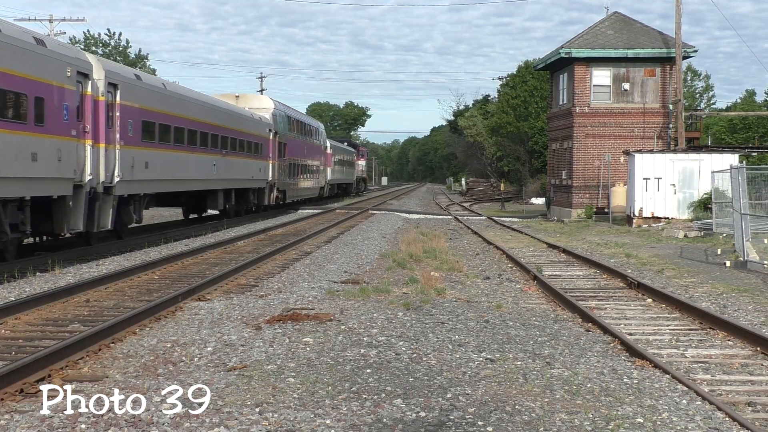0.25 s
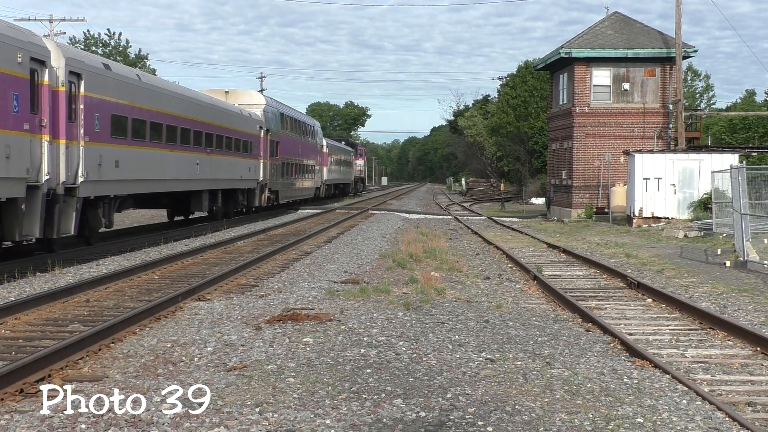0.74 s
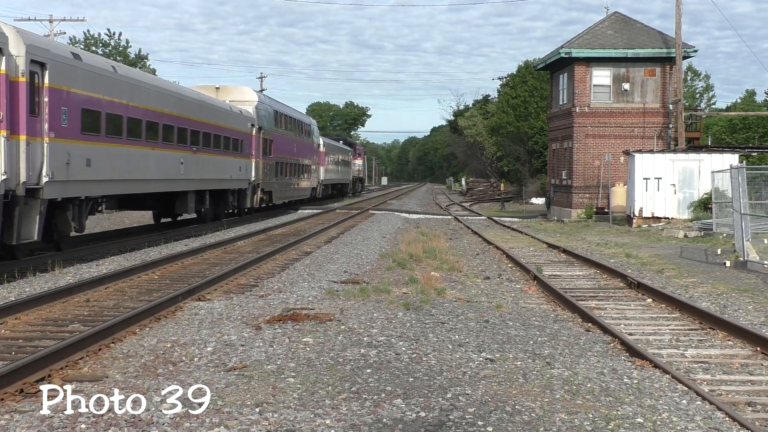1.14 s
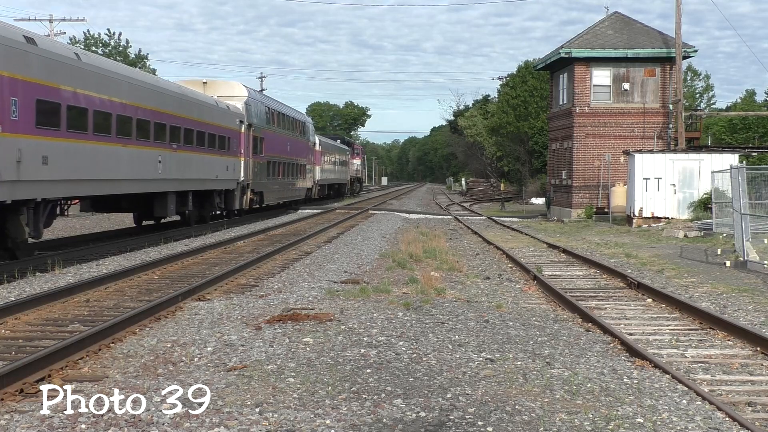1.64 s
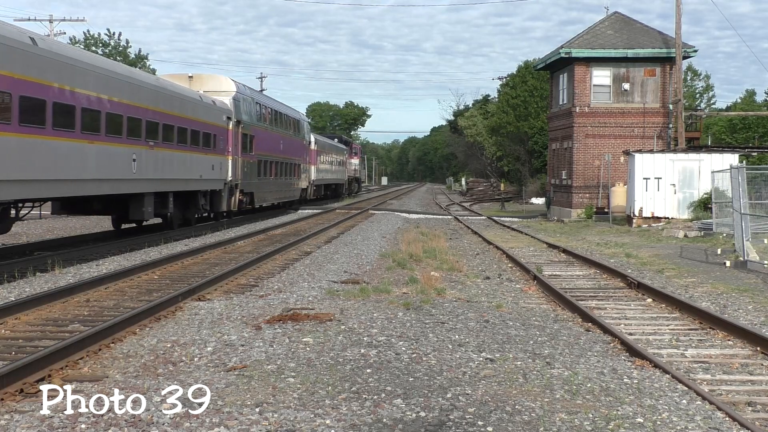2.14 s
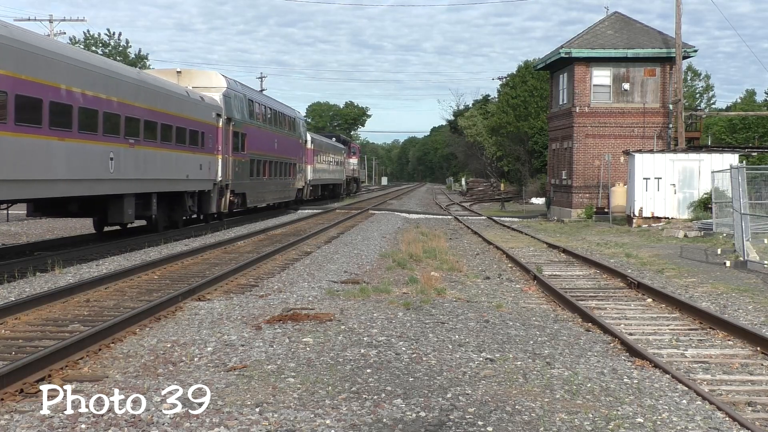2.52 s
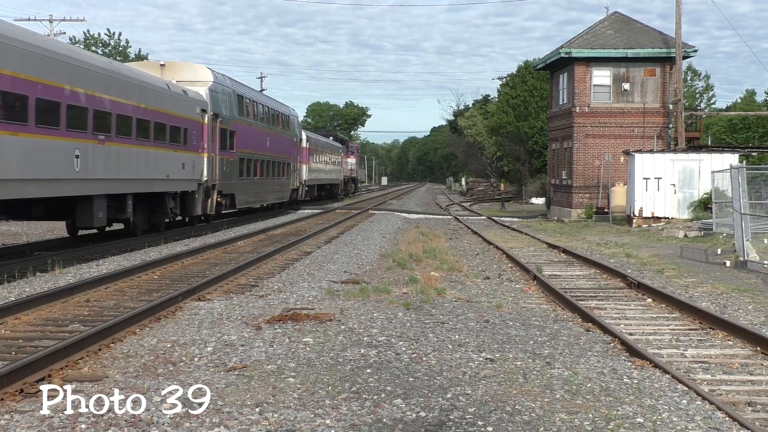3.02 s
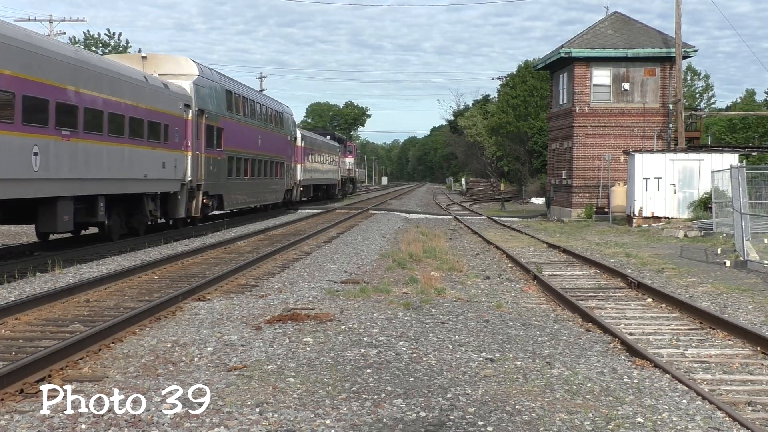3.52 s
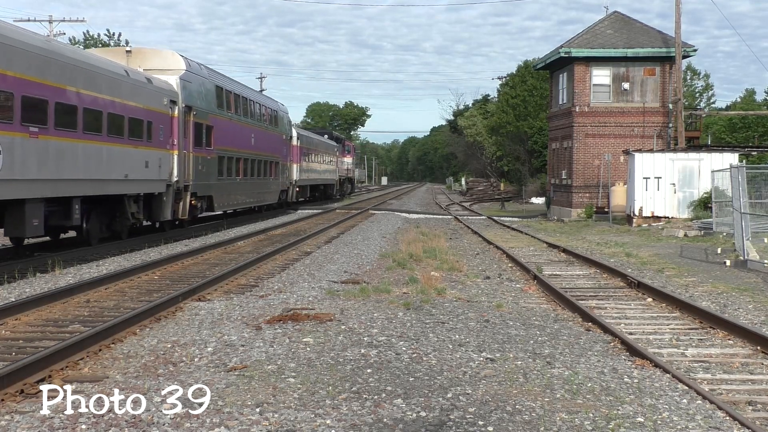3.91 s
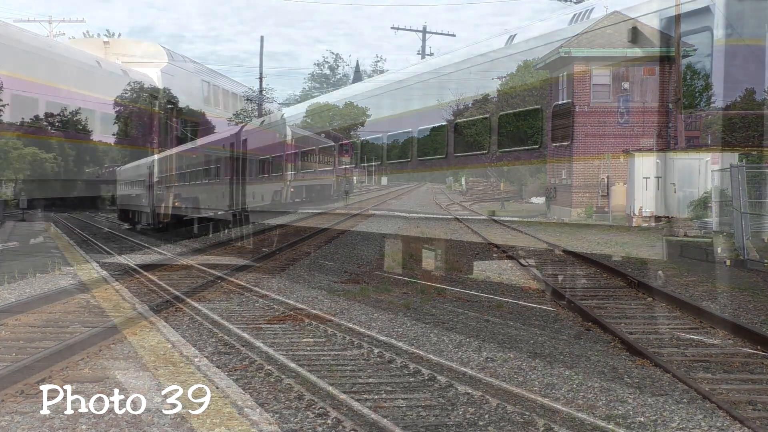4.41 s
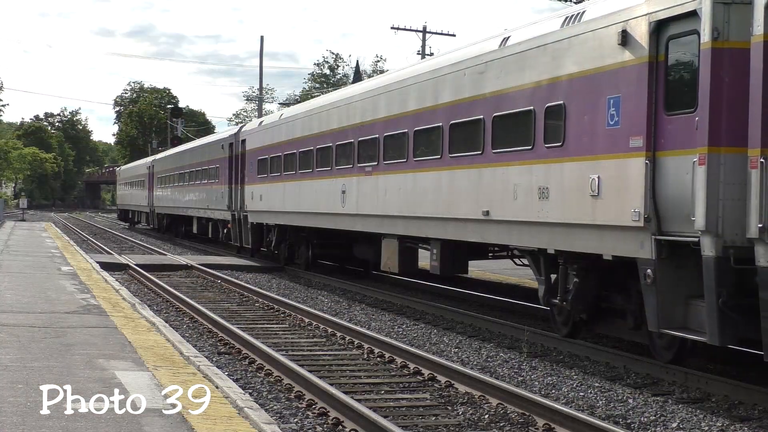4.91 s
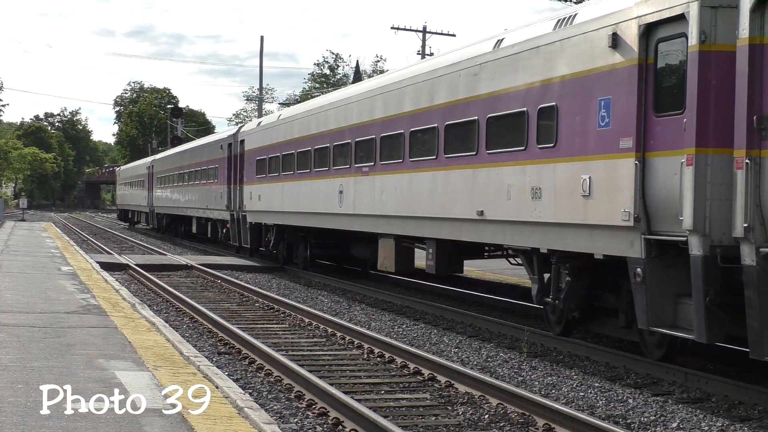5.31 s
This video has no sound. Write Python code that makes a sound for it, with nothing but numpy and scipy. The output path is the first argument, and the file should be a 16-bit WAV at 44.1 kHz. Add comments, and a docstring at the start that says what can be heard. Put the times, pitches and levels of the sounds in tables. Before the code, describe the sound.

Slow passenger train coaches squeal piercingly over clacking rail joints, then the squeals thin out and a second train's steady rumble and hum take over.

```python
"""Wheels squeal on a curve and knock over rail joints as passenger coaches roll slowly past.
The squeal drifts from near the middle to the right and thins out into short chirps; a flange sings higher.
The first train fades while a second swells: steady rumble, generator hum, thin whines, a rubbing brake.
Rolling and knocks are shaped noise; squeals, hums and whines are tones roughened by slow random drift."""
import sys
import numpy as np
from scipy import signal
from scipy.fft import rfft, irfft, next_fast_len
from scipy.io import wavfile
from scipy.ndimage import uniform_filter1d

SR = 44100
rng = np.random.default_rng(int(sys.argv[2]) if len(sys.argv) > 2 else 0)


def store_pcm(level_fs):
    """Save levels as 16-bit WAV."""
    pcm = np.round(np.clip(level_fs, -1, 1) * 32767).astype(np.int16)
    wavfile.write(sys.argv[1], SR, np.atleast_2d(pcm).T)


N = 244755
T = np.arange(N) / SR  # time in seconds

# A wheel slips in squeals. Each row: start in seconds, end in seconds, first pitch in Hz, last pitch in Hz,
# then levels in dB, before each partial's own trim, of the main note, octave, third and fourth partial.
SQUEALS = [(.008, .016, 3624, 3620, -22, -39, -48, -51), (.112, .203, 3662, 3605, -22, -33, -50.5, -52),
           (.224, .254, 3613, 3570, -23, -35, -47.5, -56), (.295, .342, 3640, 3680, -24, -50, -60, -66),
           (.351, .361, 3610, 3585, -21, -38, -45.5, -46), (.394, .412, 3585, 3580, -23, -40, -46, -46),
           (.432, .48, 3580, 3565, -22, -41, -45.5, -47), (.502, .52, 3615, 3610, -25, -46, -58, -62),
           (.531, .605, 3552, 3555, -21, -34, -45.5, -51), (.637, .712, 3558, 3515, -25, -37.5, -47, -51),
           (.8, .839, 3560, 3505, -23.5, -43, -54, -54), (.858, .9, 3600, 3575, -24, -52, -64, -70),
           (1.09, 1.151, 3626, 3585, -36, -57, -80, -79), (1.274, 1.3, 3610, 3552, -23, -41, -51, -62),
           (1.312, 1.49, 3548, 3528, -25, -35.5, -48, -58), (1.51, 1.618, 3525, 3490, -28.5, -32, -45, -53),
           (1.726, 1.85, 3480, 3526, -26, -37, -45, -49), (1.879, 1.995, 3530, 3498, -30, -39, -49, -51),
           (2.027, 2.089, 3485, 3472, -25, -39, -43.5, -53),
           (2.214, 2.35, 3455, 3502, -23, -38.5, -49, -56), (2.37, 2.435, 3502, 3495, -25, -40, -52, -58),
           (2.465, 2.595, 3483, 3465, -25.5, -42, -57, -63), (4.29, 4.42, 3540, 3530, -31.5, -59, -76, -85),
           (4.56, 4.66, 3550, 3525, -35, -65, -80, -85)]
# Wheel modes that slipping also stirs. Each row: pitch in Hz, width in Hz, relative level in dB.
WHEEL_MODES = [(4710, 140, -25), (5420, 71, -27.5), (5950, 240, -21.5), (8690, 170, -24),
               (11700, 610, -21.5), (13400, 360, -29)]
# Wheels meeting rail joints. Each row: time in seconds, thud level in dB, clang level in dB (before trims).
KNOCKS = [(0.018, -26, -38), (0.308, -33, -45), (0.643, -35, -44), (0.866, -31, -49.5), (1.102, -25, -39),
          (1.208, -27, -45), (1.316, -28.5, -60), (1.557, -29, -45), (1.788, -31, -50), (2.214, -30, -41),
          (2.277, -26, -41), (2.76, -25, -29), (3.009, -31, -44), (3.1, -29, -40), (3.209, -24, -41),
          (3.26, -24, -33), (3.726, -28, -36), (3.775, -25, -31)]
# Colour of the hiss and rasp. Each row: frequency in Hz, relative level in dB per Hz.
HISS_COLOUR = [(2000, 7), (5000, 2.5), (7500, 6.5), (9500, 1.5), (12000, 0.5), (14500, -12), (16000, -31)]
# First train's stereo likeness. Each row: frequency in Hz, left-right likeness (0-1), left's lead in radians.
FIRST_SAME = [(60, .97, 1.17), (230, .96, 1.3), (380, .93, 1.85), (500, .55, 2.45), (620, .4, 2.5),
              (700, .4, 4.2), (880, .6, 5.8), (1050, .72, 5.5), (2000, .72, 6.25), (3100, .58, 6.45),
              (5000, .15, 6.4), (7000, .3, 5.3), (10000, .85, 6.28)]
# First train's stereo balance. Each row: frequency in Hz, left minus right in dB.
FIRST_SIDE = [(60, 8.5), (200, 3.5), (380, -2), (700, -12.5), (1290, -3.5), (4400, -5), (8120, -8),
              (15000, 0)]


def amp(db):
    """Decibels to gain."""
    return 10 ** (np.asarray(db) / 20)


def unit(x):
    """Scales to rms 1."""
    return x / np.sqrt(np.mean(abs(x) ** 2) + 1e-20)


def follow(rows, t=T):
    """The columns of a curve at the times t."""
    s, *columns = np.transpose(rows)
    return [np.interp(t, s, c) for c in columns]


def read(points, hz):
    """Reads a spectrum on a log-frequency axis."""
    f, value = np.transpose(points)
    return np.interp(np.log(hz + 1), np.log(f), value)


def gate(start, end, fade):
    """1 between two times, with sloping edges outside them."""
    return np.clip(1 + np.minimum(T - start, end - T) / fade, 0, 1)


def held(start, end, grow, t60):
    """A friction tone's envelope: it grows ahead of its start, holds, and rings out after its end."""
    growth = np.clip(1 + (T - start) / grow, 0, 1) ** 2
    return growth * np.exp(-np.log(1000) * np.maximum(T - end, 0) / t60)


def bumps(times, lengths):
    """One smooth swell for each event, as rows."""
    return np.cos(np.pi * np.clip((T - times[:, None]) / lengths[:, None], -.5, .5)) ** 2


def blows(times, levels_db, rise, t60):
    """The envelope of a row of blows: each rises quickly and dies away by 60 dB in t60 seconds."""
    age = np.maximum(T - np.asarray(times)[:, None], 0)
    decay = np.exp(-np.log(1000) * age / t60)
    return (amp(np.asarray(levels_db)[:, None]) * np.minimum(age / rise, 1) * decay).sum(0)


def flutter(width_hz):
    """Complex noise of rms 1 that wanders at about the given rate."""
    # Made at a twentieth of the sample rate, then filled in
    f = np.fft.fftfreq(N // 20 + 2, 20 / SR)
    random_phase = np.exp(2j * np.pi * rng.random(len(f)))
    slow = np.fft.ifft(random_phase / (1 + abs(f / width_hz) ** 3))
    return np.interp(np.arange(N) / 20, np.arange(len(f)), unit(slow))


def turn(hz):
    """A unit phasor that follows a pitch."""
    return np.exp(2j * np.pi * np.cumsum(hz * np.ones(N)) / SR)


def pan(side_db):
    """Left and right gains of mean power 1, from left minus right in dB."""
    g = amp(np.array([[.5], [-.5]]) * side_db)
    return g / np.sqrt(np.mean(g ** 2, 0))


def ports(lead):
    """Phase turns that let the left channel lead the right, in radians."""
    return np.exp(1j * np.array([[.5], [-.5]]) * lead)


def tone(phasor, width_hz, scatter, alike=0.3):
    """A tone that arrives directly and over shifting paths, partly alike for the two ears."""
    share, same = np.clip(scatter, 0, 1), np.clip(alike, 0, 1)
    left = flutter(width_hz)
    right = same * left + np.sqrt(1 - same ** 2) * flutter(width_hz)
    paths = np.array([left, right])
    return np.sqrt(2) * (phasor * (np.sqrt(1 - share) + np.sqrt(share) * paths)).real


def skirt(phasor, order):
    """Uneven friction smears a partial into a wide, rough skirt."""
    skirt_db, skirt_hz = -21, 150  # level against the note; width for order 1
    return amp(skirt_db) * tone(phasor ** order, skirt_hz * order, scatter=1)


def noise(spectrum, same, side, patchy_db, flicker_db, size=512):
    """Stereo noise of rms 1 with drifting patches and a flicker shared by all frequencies."""
    hop = size // 4
    frames, hz = N // hop + 5, np.fft.rfftfreq(size, 1 / SR)
    a, b, c, d, patches = rng.standard_normal((5, frames, len(hz)))
    # Smoothing over time and frequency turns random levels into patches
    patches = unit(uniform_filter1d(uniform_filter1d(patches, size=14, axis=0), size=7, axis=1))
    flicker = unit(uniform_filter1d(rng.standard_normal(frames), size=5))[:, None]
    z = np.array([a + 1j * b, c + 1j * d]) * amp(patchy_db * patches + flicker_db * flicker)
    waves = signal.istft(z.transpose(0, 2, 1), nperseg=size, noverlap=size - hop)[1][:, :N]
    length = next_fast_len(N)
    left, other = rfft(waves, length)
    # Mix the two noises to the wanted likeness, then set balance and colour
    hz = np.fft.rfftfreq(length, 1 / SR)
    like, lead = [read(np.array(same)[:, [0, column]], hz) for column in (1, 2)]
    pair = ports(lead) * np.array([left, like * left + np.sqrt(1 - like ** 2) * other])
    coloured = pair * pan(read(side, hz)) * amp(read(spectrum, hz))
    return unit(irfft(coloured, length)[:, :N])


def grip(levels_db, grow, t60):
    """The envelope of one partial through all the squeals."""
    spells = [amp(db) * held(start, end, grow, t60) for (start, end, *_), db in zip(SQUEALS, levels_db)]
    return np.max(spells, 0)


def squeal():
    """Stick-slip drives one wheel mode with overtones, stirs other modes and rasps."""
    # Where the squeal comes from. Each row: time in seconds, left minus right in dB.
    squeal_side = [(0, 1.5), (.9, -2), (1.3, -9), (2.1, -16), (2.7, -17)]
    # Purer while the wheel slips steadily. Each row: time in seconds, scattered share (0-1).
    squeal_scatter = [(.2, .2), (.38, .33), (.56, .1), (.8, .3), (1.4, .2), (1.6, .52), (1.95, .55),
                      (2.05, .2), (2.6, .13), (4.3, .12)]
    main_grow_s, main_t60_s = 0.044, 0.11
    # Overtones build faster than the main note and ring out a little longer
    over_grow_s, over_t60_s = 0.0161, .15
    chatter_db, chatter_hz = 2, 22.8  # the grip is uneven
    rebound_hz = 44.53  # the note rises between squeals, when the wheel is unloaded

    main_db, *overtones_db = np.transpose(SQUEALS)[4:]
    levels = [grip(main_db, main_grow_s, main_t60_s)]
    levels += [grip(db, over_grow_s, over_t60_s) for db in overtones_db]
    base, octave, third, fourth = [level * amp(chatter_db * flutter(chatter_hz).real) for level in levels]

    pitch_points = [point for start, end, first, last, *_ in SQUEALS
                    for point in ((start, first), (end, last))]
    glide, = follow(pitch_points)
    load = grip(np.zeros(len(SQUEALS)), over_grow_s, over_t60_s)
    wheel = turn(glide + rebound_hz * (1 - load) + 8 * flutter(40).real)

    scatter, = follow(squeal_scatter)
    side_db, = follow(squeal_side)
    rough = scatter + .08  # overtones are rougher
    note = tone(wheel, width_hz=60, scatter=scatter, alike=0.05) + skirt(wheel, 1)
    out = amp(-2.5) * base * pan(side_db) * note
    # The fractional order jumps in phase each cycle, so this skirt spreads over several harmonics
    octave_note = tone(wheel ** 2, width_hz=124, scatter=rough, alike=0.68) + skirt(wheel, 2.3)
    out += amp(-3.0) * octave * pan(-13.5) * octave_note
    out += third * pan(-3.5) * tone(wheel ** 3, width_hz=164, scatter=rough, alike=1.0)
    out += amp(-4.5) * fourth * pan(-10) * tone(wheel ** 4, width_hz=130, scatter=rough, alike=0.73)

    rasp = noise(HISS_COLOUR, FIRST_SAME, FIRST_SIDE, patchy_db=2.5, flicker_db=2)
    out += amp(-14.5) * third * rasp
    modes = sum(amp(db + 5 * flutter(8).real) * tone(turn(hz), width / 2, scatter=1)
                for hz, width, db in WHEEL_MODES)
    return out + np.sqrt(octave * third) * pan(-1.66) * modes


def first_train():
    """Rolling roar swells at each joint, over a distant engine's drone and a fine hiss; all fade late."""
    # Rolling roar. Each row: time in seconds, level in dB before the fade.
    rolling = [(0, -40), (.6, -45.5), (1.2, -42), (2.45, -45.5), (3.0, -39.5), (4.1, -34)]
    # Colour of the roar. Each row: frequency in Hz, relative level in dB per Hz.
    roll_colour = [(50, -33), (110, -2.5), (170, 3), (250, -5.5), (340, 3), (410, -4), (500, -5.5),
                   (700, -7), (1200, -13), (1600, -12), (1900, -15.5), (2200, -16.5), (3000, -19),
                   (5000, -26.5), (8000, -40.5)]
    # Plate modes of the rolling wheels. Each row: pitch in Hz, width in Hz, level in dB against the roar.
    plate = [(1122, 9.5, -17), (1331, 100, -15), (1580, 11, -19.5), (2148, 34, -17.5), (2700, 31, -17.5)]
    # Distant engine. Each row: time in seconds, drone in dB (before a trim), firing note in dB; both fade.
    engine = [(0, -46.5, -46), (.3, -43.5, -51), (.55, -53, -71), (1.25, -42, -54), (1.9, -58, -78),
              (2.65, -59, -63), (3.0, -46, -52), (4.05, -40, -40.5)]
    # Colour of the drone. Each row: frequency in Hz, relative level in dB per Hz.
    drone_colour = [(20, -55), (36, -25), (50, 8), (68, 1), (92, 16.5), (130, 4.5), (250, -49)]
    # Dry sliding swells the hiss. Each row: middle in seconds, length in seconds, level in dB before the fade.
    slides = [(2.104, 0.47, -52.5), (3.17, 0.046, -52), (3.94, .8, -62), (4.453, 0.74, -54)]
    truck_db, truck_s = -17.5, 0.23  # swell at each joint: level against the listed thud, length
    hiss_db, hiss_against_roll_db = -90, -25

    roll_db, = follow(rolling)
    s, thud_db, _ = np.transpose(KNOCKS)
    truck_power = amp(thud_db + truck_db) ** 2 @ bumps(s, np.full(len(s), truck_s))
    roar = np.sqrt(amp(roll_db) ** 2 + truck_power)
    roll = roar * noise(roll_colour, FIRST_SAME, FIRST_SIDE, patchy_db=1.8, flicker_db=1.1)
    roll += roar * pan(-3) * sum(amp(db) * tone(turn(hz), width, scatter=0.96) for hz, width, db in plate)

    drone_db, firing_db = follow(engine)
    drone = amp(drone_db - 2.5) * noise(drone_colour, FIRST_SAME, FIRST_SIDE, patchy_db=1, flicker_db=.5)
    firing_note = tone(turn(50.5) * ports(1.17), width_hz=3, scatter=0.15, alike=.95)
    firing = amp(firing_db) * pan(4.2) * firing_note

    s, length, slide_db = np.transpose(slides)
    sliding = amp(hiss_db) + amp(hiss_against_roll_db) * roar + amp(slide_db) @ bumps(s, length)
    hiss = sliding * noise(HISS_COLOUR, FIRST_SAME, FIRST_SIDE, patchy_db=2, flicker_db=1.3)
    fade, = follow([(4.3, 0.9), (4.8, 0.29)])  # seconds, gain
    return fade * (roll + drone + firing + hiss)


def far_wheels():
    """Wheels further along keep ringing softly on one wandering note, its octave and their other modes."""
    # Each row: time in seconds, level in dB, pitch in Hz.
    ringing = [(0, -35, 3572), (.75, -40, 3564), (1.0, -42.5, 3570), (1.23, -49, 3570), (1.5, -32.5, 3547),
               (1.92, -36, 3560), (2.2, -38, 3540), (2.66, -41.5, 3490), (2.95, -37, 3528),
               (3.5, -44, 3517), (4.2, -49.5, 3476), (4.5, -39.5, 3525), (4.75, -51, 3620),
               (5.55, -67, 3460)]
    modes_db = -14.5  # added to the listed level of each wheel mode
    ring_db, ring_hz = follow(ringing)
    far = turn(ring_hz + 14 * flutter(3.15).real)
    ring = tone(far, width_hz=48, scatter=0.65)
    ring += amp(-24) * tone(far ** 2, width_hz=120, scatter=0.6)
    ring += sum(amp(db + modes_db) * tone(turn(hz), width / 2, scatter=0.71) for hz, width, db in WHEEL_MODES)
    return amp(ring_db) * pan(-10.0) * ring


def joints():
    """Each wheel that drops over a joint thuds in the track and clangs in the truck."""
    # Colour of the thud. Each row: frequency in Hz, relative level in dB per Hz.
    thud_colour = [(60, -9), (160, 5.5), (350, 20.5), (600, 0.5), (1200, -37)]
    # Colour of the clang. Each row: frequency in Hz, relative level in dB per Hz.
    clang_colour = [(400, 0), (1100, 0), (2200, -5), (3000, -3.5), (3600, -13), (4400, -22), (12000, -54)]
    s, thud_db, clang_db = np.transpose(KNOCKS)
    thud = blows(s, thud_db - 7, rise=0.0016, t60=0.18)
    thud = thud * noise(thud_colour, FIRST_SAME, FIRST_SIDE, patchy_db=1, flicker_db=1)
    clang = blows(s, clang_db + 1, rise=0.0014, t60=0.13)
    clang = clang * noise(clang_colour, FIRST_SAME, FIRST_SIDE, patchy_db=3, flicker_db=1)
    return thud + clang


def struck_wheel():
    """The wheel and its truck ring with each knock; one mode lingers."""
    # Modes left ringing. Each row: pitch in Hz, level in dB against the listed clang, 60 dB decay in seconds.
    struck = [(320, -6, .14), (834, -17, .16), (1190, -8, .06), (1545, -16, .15), (2140, -14, .07),
              (2825, -18, .7)]
    s, _, clang_db = np.transpose(KNOCKS)
    push = np.zeros(N)
    push[np.round(s * SR).astype(int)] = amp(clang_db)
    out = 0
    for hz, db, t60 in struck:
        keep_per_sample = np.exp(-np.log(1000) / (t60 * SR))
        ring = signal.lfilter([1], [1, -keep_per_sample], push + 1e-18)
        out = out + amp(db) * ring * tone(turn(hz), width_hz=23, scatter=0.15)
    return pan(-3) * out


def flange():
    """A flange rubs the rail head and sings, its note wandering until it settles on one wheel mode."""
    # Each row: start in seconds, end in seconds, level in dB, left minus right in dB.
    rubs = [(0.88, 1.16, -52.5, -7), (1.98, 2.757, -54.5, -9), (2.87, 3.47, -40, -2.5),
            (3.11, 3.232, -38.5, -1.5), (3.555, 3.87, -44, -19), (3.938, 4.28, -37, -21),
            (4.392, 4.61, -40.5, -20), (4.73, 4.834, -50, -6)]
    # Each row: time in seconds, pitch in Hz.
    flange_pitch = [(.83, 3950), (.97, 4075), (1.15, 3990), (2.0, 4003), (4.1, 3998)]
    grow_s, t60_s = 0.12, 0.5
    pitch, = follow(flange_pitch)
    rim = turn(pitch + 10 * flutter(30).real)
    song = amp(2 * flutter(8).real) * (tone(rim, width_hz=70, scatter=0.3) + skirt(rim, 1))
    levels = [amp(db) * pan(side_db) * held(start, end, grow_s, t60_s) for start, end, db, side_db in rubs]
    return song * np.max(levels, 0)


def slips():
    """Brief squeaks whose pitch dips as the wheel bites."""
    # Each row: middle in seconds, length in seconds, lowest pitch in Hz, level in dB, octave level in dB.
    short_slips = [(1.654, 0.013, 3500, -21.5, -57), (2.737, 0.046, 3420, -27.5, -44),
                   (3.035, 0.079, 3496, -24.5, -51.5), (3.25, 0.0744, 3420, -30, -48.5),
                   (3.77, 0.079, 3423, -26.5, -45)]
    free_hz = 3505  # the wheel's note when lightly loaded
    s, length, low_hz, level_db, octave_db = np.transpose(short_slips)
    bite = bumps(s, length)
    wheel = turn(free_hz + (low_hz - free_hz) @ np.sqrt(bite))
    out = amp(level_db) @ bite * tone(wheel, width_hz=25, scatter=0.51)
    overtones = tone(wheel ** 2, width_hz=93, scatter=0.65)
    overtones += amp(-14.5) * tone(wheel ** 3, width_hz=120, scatter=.7)
    out += amp(octave_db) @ bite * overtones
    return pan(-14) * out


def clinks():
    """Loose steel under the coach strikes and rings briefly."""
    # Each row: time in seconds, pitch in Hz, level in dB.
    loose_steel = [(2.215, 2220, -37), (3.101, 1870, -33)]
    return pan(-4) * sum(blows([s], [db], rise=.002, t60=.06) * tone(turn(hz), width_hz=60, scatter=.2)
                         for s, hz, db in loose_steel)


def second_train():
    """Rumble, generator hum and machinery whines swell together."""
    # Each row: time in seconds, level in dB.
    approach = [(2.8, -100), (3.5, -60), (4.0, -43.5), (4.25, -31), (4.7, -26), (5.15, -25.5),
                (5.55, -27.5)]
    # Colour of the rumble. Each row: frequency in Hz, relative level in dB per Hz.
    rumble_colour = [(22, -27), (50, 1), (120, -1.5), (250, 4.5), (520, 3.5), (1000, -1), (1900, -7),
                     (3000, -16), (4400, -22), (6000, -34.5), (7200, -29.5), (8500, -49), (12500, -46.5),
                     (16000, -60)]
    # Stereo likeness. Each row: frequency in Hz, left-right likeness (0-1), left's lead in radians.
    second_same = [(120, .97, .87), (220, .97, 1.47), (500, .95, 2.36), (1300, .76, 2.95), (2000, .83, 3.4),
                   (3200, .68, 3.55), (5000, .53, 4), (7200, .55, 4.7), (10000, .55, 6.28)]
    # Stereo balance. Each row: frequency in Hz, left minus right in dB.
    second_side = [(100, 0), (380, -2), (700, -10), (1290, -4.5), (2380, -6), (8120, -10.5), (15000, -16)]
    # Generator hum. Each row: pitch in Hz, level in dB against the rumble.
    generator = [(90.2, -5.5), (180.3, -20.5)]
    # Fans and gears. Each row: pitch in Hz, width in Hz, level in dB against the rumble, left's lead in radians.
    machinery = [(242, 5, -15, 1.6), (442, 5, -14, 2.2), (495, 4, -18, 2.4), (518, 16, -15, 2.4),
                 (663, 5, -21, 2.6), (947, 6, -23, 2.6), (1105, 8, -20.5, 2.9), (1325, 4, -15, 2.9),
                 (1492, 4, -17.5, -1), (1669, 5, -18.5, 1), (4120, 30, -32, 0), (4410, 35, -33, 0)]
    level_db, = follow(approach)
    rumble = noise(rumble_colour, second_same, second_side, patchy_db=0.7, flicker_db=.7)
    hum = sum(amp(db) * tone(turn(hz) * ports(.85), width_hz=4, scatter=.005) for hz, db in generator)
    # A lower engine note joins the hum
    throb = amp(-11) * gate(5.2, 5.55, .3) * tone(turn(70.2) * ports(.85), width_hz=3, scatter=.05)
    whines = pan(-6) * sum(amp(db) * tone(turn(hz) * ports(lead), width, scatter=.45)
                           for hz, width, db, lead in machinery)
    return amp(level_db) * (rumble + hum + throb + whines)


def grit_spurts():
    """Small spurts of steel and grit: each starts with a snap and fizzes out."""
    # Each row: time in seconds, snap level in dB, fizz level in dB.
    ticks = [(2.9464, -52, -49), (3.0996, -52, -49), (3.2299, -51, -59), (3.3878, -60, -60),
             (3.4521, -57, -56), (3.5192, -56, -54), (3.609, -50, -51), (3.7429, -57, -49.5),
             (4.9195, -37.5, -68)]
    # Colour of the grit. Each row: frequency in Hz, relative level in dB per Hz.
    grit_colour = [(3000, -14), (5000, 7), (8000, 2), (12000, -3), (15500, -14)]
    s, snap_db, fizz_db = np.transpose(ticks)
    spurts = blows(s, snap_db, rise=.0003, t60=0.012)
    spurts += blows(s, fizz_db, rise=0.0041, t60=0.19)
    return spurts * noise(grit_colour, FIRST_SAME, FIRST_SIDE, patchy_db=2, flicker_db=2)


def brake():
    """A two-note whine that swells and sizzles each time the shoe catches the wheel."""
    # Short rubbing spells. Each row: start in seconds, end in seconds, lower note in dB, upper note in dB.
    spells = [(4.207, 4.41, -45, -67), (4.465, 4.516, -40.5, -51.5), (4.726, 4.78, -41.5, -52.5),
              (4.8, 4.848, -39.5, -47), (4.988, 5.028, -44.5, -49), (5.066, 5.142, -42, -54.5),
              (5.266, 5.292, -40.5, -51), (5.327, 5.342, -42, -55.5), (5.51, 5.557, -45, -52.5)]
    # Pitches in Hz of the lower and upper note.
    brake_hz = (2720, 5469)
    # Drag between spells, in dB against the lower and upper note.
    brake_drag_db = (-7, -14)
    # High modes. Each row: pitch in Hz, level in dB against the upper note's middle level.
    brake_modes = [(7050, -8), (8650, -15), (10400, -18.5)]
    grow_s, t60_s = 0.014, 0.21
    start, end, *notes_db = np.transpose(spells)
    rubs = np.array([held(a, b, grow_s, t60_s) for a, b in zip(start, end)])
    drag = gate(start[0], end[-1], 0.16)  # between spells the shoe still drags a little
    whine = 0
    for hz, db, drag_db in zip(brake_hz, notes_db, brake_drag_db):
        caught = (amp(db)[:, None] * rubs).max(0)
        dragging = drag * amp(drag_db + np.interp(T, start, db))
        whine = whine + np.maximum(caught, dragging) * tone(turn(hz), width_hz=40.3, scatter=0.43)
    modes = sum(amp(db) * tone(turn(hz), width_hz=130, scatter=0.96) for hz, db in brake_modes)
    sizzle = amp(np.median(notes_db[1])) * rubs.max(0) * modes
    return pan(-4.0) * (whine + sizzle)


def scrape():
    """A short harsh rasp that starts and stops sharply, strongest at its start."""
    # Colour of the scrape. Each row: frequency in Hz, relative level in dB per Hz.
    scrape_colour = [(200, -30), (600, 3), (1000, 0), (1600, 0), (2300, -2), (3200, -4.5), (4300, -20),
                     (6000, -25), (12000, -63)]
    force = amp(-30.7) * gate(4.121, 4.167, .002)
    force = force + blows([4.119], [-30.5], rise=.0005, t60=.06)
    return force * noise(scrape_colour, FIRST_SAME, FIRST_SIDE, patchy_db=1, flicker_db=1.3)


def chirp():
    """A thin whistle that falls quickly."""
    # Each row: time in seconds, pitch in Hz, level in dB.
    fall = [(4.92, 4550, -56), (4.96, 3950, -50), (4.985, 3280, -44), (5.01, 2780, -51)]
    pitch, level_db = follow(fall)
    level = amp(level_db) * gate(fall[0][0], fall[-1][0], 0.01)
    return level * pan(-5) * tone(turn(pitch), width_hz=93, scatter=.08)


def scene():
    """Both trains, in the open air."""
    first = squeal() + first_train() + far_wheels() + joints() + struck_wheel()
    first += flange() + slips() + clinks() + grit_spurts() + scrape()
    second = second_train() + brake()
    return first + second + chirp()


def record(dry):
    """A steep low-pass filter removes the highest treble."""
    edge_hz = 15600
    low_pass = signal.firwin(511, edge_hz, window=("kaiser", 9), fs=SR)
    return signal.oaconvolve(dry, low_pass[None], "same")


dry = scene()
out = record(dry)
store_pcm(out)
```